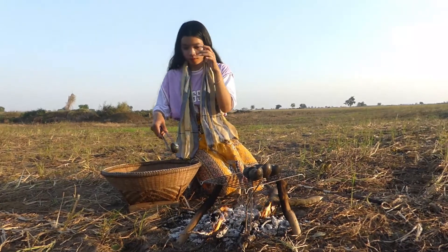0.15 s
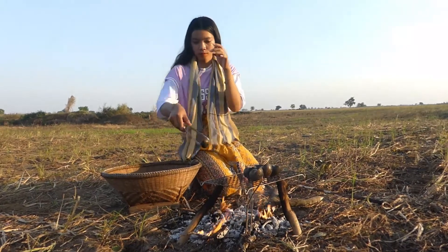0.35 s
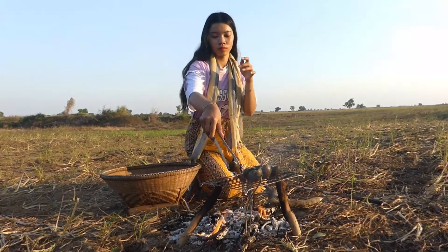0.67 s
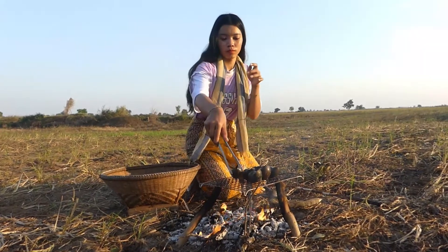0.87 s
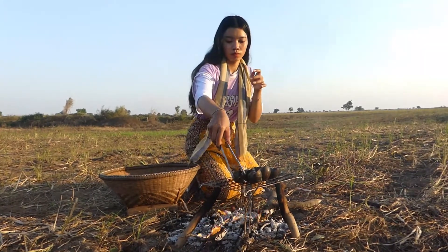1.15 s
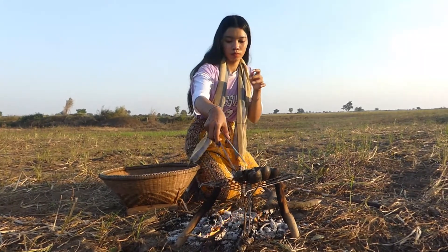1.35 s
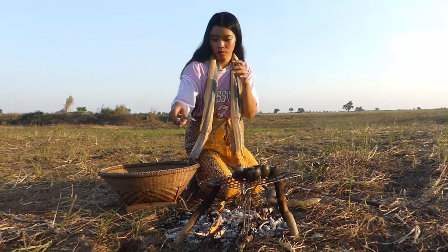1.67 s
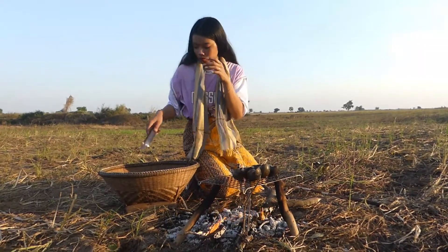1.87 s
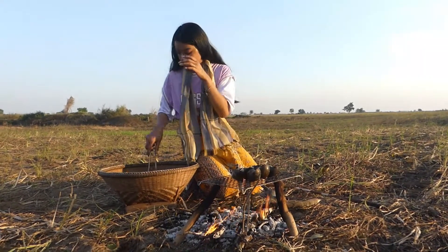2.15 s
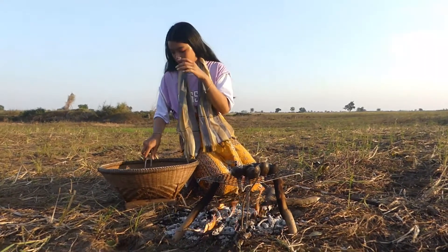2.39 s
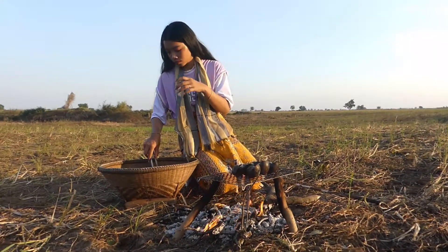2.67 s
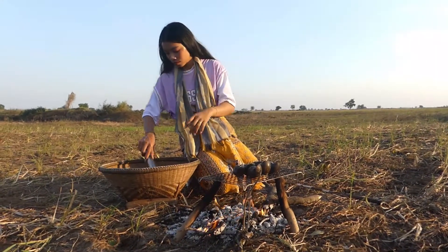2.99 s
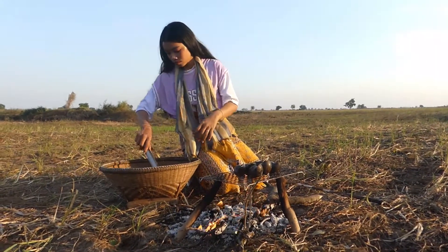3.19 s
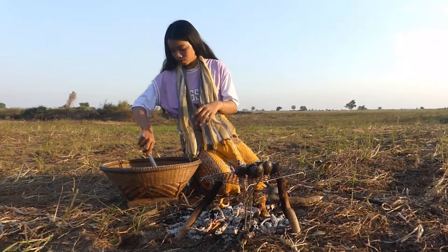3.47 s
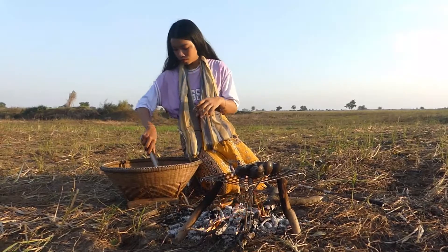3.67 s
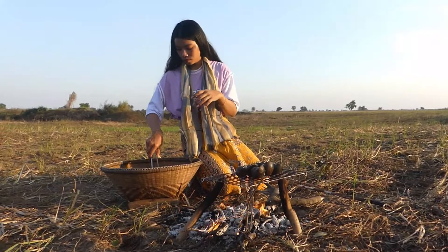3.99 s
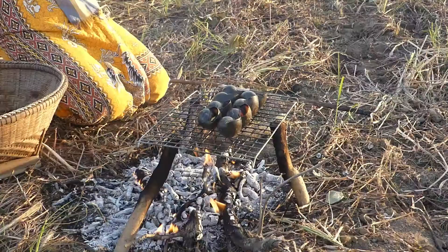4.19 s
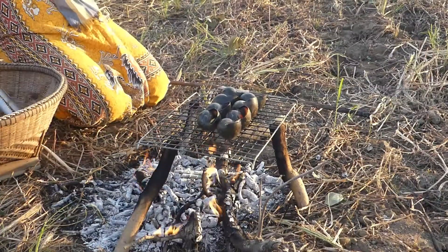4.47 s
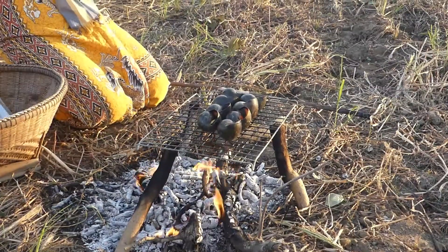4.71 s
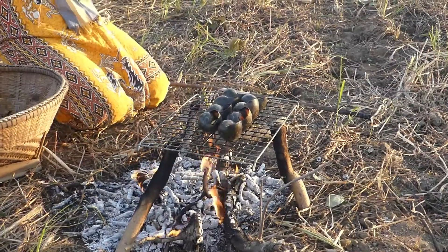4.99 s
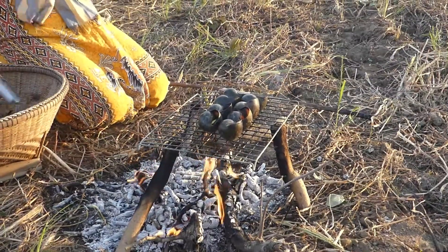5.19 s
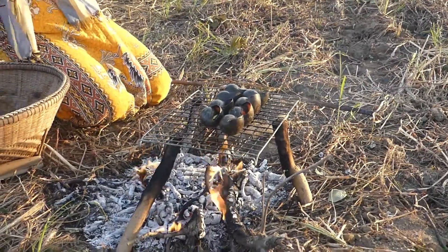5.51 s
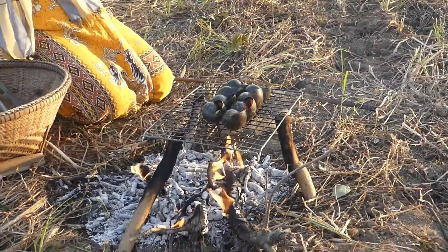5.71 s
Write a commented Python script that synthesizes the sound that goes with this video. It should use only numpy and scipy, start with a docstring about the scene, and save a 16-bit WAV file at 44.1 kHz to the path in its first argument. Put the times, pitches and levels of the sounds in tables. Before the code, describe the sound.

A soft, wide, open-field hush with low uneven wind and a faint steady insect-like band. From 0 to 2 s it is sparse: delicate metal tong ticks, a few dry ember clicks, faint gliding chick peeps, and light shell taps near 0.3, 1.0 and 1.35 s. From about 2.3 s tongs rummage among snail shells in a woven basket: hard, dry clacks with quick chattering rebounds, short gritty scrapes and small bright chinks, strong around 2.6, 2.9 and 3.55 s. Chick peeps grow clearer and quicker between 2.4 and 4.1 s, while knocks thin out after 3.65 s. At 4.2 s everything cuts to complete silence until about 4.46 s. The hush fades back and the shells sound closer, with fuller thuds under the knocks. Dense rattling and scraping peaks around 4.9, 5.15 and 5.5 s, with a low wind swell near 5.35 s, a few faint peeps, and busy scraping at the end, 5.85 s.

```python
"""Snail shells knock, chatter and scrape in a woven basket as metal tongs rummage among them.
Each shell is a set of dying rings, struck by bursts of contacts or rubbed by dense tiny clicks.
The tongs tick with two short rings, embers of a small fire snap as clicks, chicks peep as gliding sines.
Shaped noise makes the wide hush and wind of the open field. All falls silent for a quarter second;
then the hush fades back in, and the thuds under the knocks are fuller, as if nearer to the basket."""
import sys
import numpy as np
from scipy import signal
from scipy.fft import rfft, irfft
from scipy.io import wavfile
from scipy.ndimage import uniform_filter1d

SR = 44100
rng = np.random.default_rng(int(sys.argv[2]) if len(sys.argv) > 2 else 0)


def int16_out(signal):
    """Quantize to a 16-bit WAV file."""
    q = np.round(np.clip(np.atleast_2d(signal).T, -1, 1) * 32767)
    wavfile.write(sys.argv[1], SR, q.astype(np.int16))


def voltage_ratio(decibels):
    """Convert decibels (scalar or array-like) to amplitude ratios, 20 dB per decade."""
    exponent = np.asarray(decibels, float) / 20
    return 10 ** exponent


N = 257984
TIME = np.arange(N) / SR

# Hush of the field, summed over left and right: [f/Hz, relative level per Hz/dB]
HUSH_SPECTRUM = [(20, -35.5), (60, -3.5), (110, 4), (280, -4.5), (400, -8), (620, -12), (1100, -13),
                 (1450, -13), (2900, -18.5), (4700, -18), (7600, -19), (10000, -17.5), (13000, -22),
                 (15300, -24.5), (16500, -51.5)]
# How alike left and right are, 1 same and -1 opposed: [f/Hz, likeness]
HUSH_LIKENESS = [(60, -0.62), (130, -0.49), (290, -0.65), (640, -0.52), (1410, -0.48), (3100, 0.16),
                 (6820, 0.42), (15000, 0.48)]
# Stereo balance of the field: [f/Hz, left over right/dB]
HUSH_BALANCE = [(60, 1.5), (240, 2), (950, 1), (3770, 0.5), (15000, -1)]
# Far steady bands, the top one of insects: [f/Hz, width/Hz, level on the hush spectrum's scale/dB]
DRONE_BANDS = [(478, 26.8, 5.5), (829, 15, -4), (5300, 350, -18.5)]
# Slow course of the wind, before its lumps and its low-pass: [t/s, level/dB]
WIND_COURSE = [(0, -63.5), (4.2, -65), (4.46, -73), (4.9, -60), (5.15, -60), (5.35, -51), (5.55, -58),
               (5.85, -58.5)]
# Return of the hush after the silence: [t/s, change of level/dB]
HUSH_RETURN = [(4.456, -13), (4.6, -4.5), (5.0, -1.5), (5.85, 2.5)]
# Small ticks of the tongs: [t/s, peak level/dB, upper ring over lower ring/dB]
TONG_TICKS = [(0.194, -42.5, 0), (0.2217, -50, -17), (0.392, -39, 2), (0.4125, -51, -17),
              (1.1724, -33.5, 4.5), (1.205, -40, 3), (1.2788, -43.5, 1), (1.385, -37.5, 2), (1.42, -46, 2),
              (1.589, -50, -4), (1.7, -45, 0), (1.7734, -38.5, 3), (1.956, -54, -14), (2.144, -51, -15),
              (3.948, -49, -17)]
# The two rings of the tongs: [f/Hz, time to fall by 60 dB/s]
TONG_RINGS = [(3900, 0.0087), (8800, 0.0049)]
# Chick calls: [start t/s, length/s, middle f/Hz, glide from start to end/Hz, level/dB]
CHICK_PEEPS = [(.205, .028, 3250, 530, -66), (0.223, 0.048, 3650, -390, -59.5),
               (0.667, 0.066, 3520, 8, -62), (0.823, 0.029, 3350, 230, -70),
               (1.003, 0.063, 3600, -160, -58), (1.21, 0.031, 3880, 60, -63),
               (1.263, 0.092, 3460, 250, -67), (1.356, 0.074, 3600, 32, -63), (1.507, .2, 3680, 600, -69.5),
               (1.586, .05, 3545, -170, -60), (1.761, 0.064, 3660, -40, -62),
               (1.862, .128, 3550, -260, -72.5), (1.984, 0.047, 3750, 30, -63),
               (2.18, 0.05, 3720, -160, -60.5), (2.379, .04, 3870, -280, -52),
               (2.544, 0.03, 3140, 349.5, -64.5), (2.565, 0.056, 3920, -10, -54),
               (2.776, 0.029, 4220, -750, -52.5), (2.933, 0.048, 3880, -50, -55),
               (3.101, 0.045, 3960, 28, -51), (3.276, 0.053, 3820, 398, -52.5),
               (3.42, .05, 4200, -220, -50), (3.581, 0.036, 4770, -140, -49),
               (3.644, 0.026, 4130, 630, -63), (3.695, 0.029, 4270, -1450, -64),
               (3.731, .018, 3700, 900, -59), (3.74, .036, 4660, -20, -49.5), (3.795, .02, 3500, 480, -62),
               (3.817, 0.018, 4650, 270, -61), (3.849, 0.022, 4520, -470, -60),
               (3.885, 0.027, 3900, 250, -52), (3.9, 0.031, 4680, -350, -50.5),
               (3.958, 0.029, 3850, 390, -58), (4.073, 0.029, 4350, -10, -48),
               (5.235, .031, 3900, -320, -64), (5.255, 0.012, 5300, -400, -63),
               (5.29, 0.014, 5330, -300, -70), (5.632, .04, 3820, -20, -60)]
# Rings of a shell in the heap: [f/Hz, relative level/dB, time to fall by 60 dB/s]
SHELL_RINGS = [(322, -7.5, 0.022), (540, 5, 0.01), (690, -11.5, 0.017), (980, -6.5, 0.042),
               (1250, -3.5, 0.012), (1650, -0.5, 0.014), (1790, -4.5, 0.0062), (2360, -2.5, 0.012),
               (2600, -23, 0.0054), (2900, -3, 0.0079), (3135, -6, 0.014), (3750, -8, 0.024),
               (4200, 4, 0.0018), (4650, -2.5, 0.0068), (5260, -2.5, 0.0052), (6144, 0, 0.018),
               (7005, 2, 0.012), (7800, -1, 0.008), (8940, -2.5, 0.025), (9990, -0.5, 0.017),
               (11200, -16, 0.0063), (11900, 5, 0.0056), (13570, -3.5, 0.015), (14200, -11, .006)]
# Shell knocks: [t/s, nominal peak level/dB, low ring f/Hz, upper rings/dB, top rings/dB];
# the last two are relative, before a fixed lift
SHELL_KNOCKS = [(0.271, -42.5, 475, -20, -17), (0.337, -45, 1280, -27, -20), (1.01, -31, 1520, -10.5, -12),
                (1.016, -34.5, 1510, -3, -8), (1.022, -48.5, 1500, -14, -10), (1.029, -38, 1380, -20, -14),
                (1.347, -24, 1430, -19, -54), (2.03, -29, 1980, 1, -25.5), (2.273, -20.5, 1900, -13, -15),
                (2.287, -27, 890, -17, -16), (2.333, -15.5, 1970, -3.5, -7), (2.338, -19.5, 1900, 0.5, -8),
                (2.359, -34.5, 523, -6, 0.5), (2.399, -32, 1950, -2, -9.5), (2.417, -39.5, 980, -10, -14),
                (2.477, -27.5, 1400, -17, -7.5), (2.54, -27, 1760, -23.5, -22),
                (2.637, -10.5, 1420, -12, -10), (2.644, -20.5, 1250, -15, -10),
                (2.677, -29, 1190, -20, -12), (2.683, -25, 1220, -4, -18), (2.697, -43, 1400, -14, -20.5),
                (2.721, -32.5, 1220, -12.5, -21), (2.762, -32.5, 2400, -6, -26),
                (2.789, -12.5, 1650, -27, -56), (2.809, -33, 1080, -21, -44), (2.912, -17, 990, 7.5, 6),
                (2.92, -13.5, 1417, 5, -49), (2.968, -24.5, 1220, -9.5, -14.5),
                (3.038, -20, 1260, -36, -52), (3.061, -22.5, 2520, -12, -14.5),
                (3.098, -26.5, 2020, -5.5, -9), (3.129, -26, 1070, -2, -29.5),
                (3.153, -36, 1060, -6.5, -18), (3.225, -39.5, 510, -5, -7), (3.316, -30, 1410, -8, -5),
                (3.345, -27.5, 524, -4, 1), (3.365, -20, 1360, -5, -15), (3.378, -22.5, 1360, -22, -15),
                (3.391, -19.5, 1250, -14, -19), (3.397, -22, 1250, -11.5, -16),
                (3.424, -20, 980, -11, -7.5), (3.439, -29, 1020, -15, -1), (3.452, -28.5, 1220, -15, -5),
                (3.499, -32, 1390, -1, -12), (3.547, -9.5, 1590, -10, -22), (3.558, -20, 544, -27, -35),
                (3.61, -30, 1510, -8.5, -21), (3.63, -30.5, 985, -38, -34), (3.879, -36.5, 1930, -28, -35),
                (3.988, -28, 2090, -15, -14), (4.024, -31.5, 1470, -8, 1), (4.049, -34.5, 1890, -11, -9),
                (4.104, -25.5, 1070, 0.5, 3), (4.48, -31, 1880, 1.5, 2.5), (4.613, -29.5, 2330, -12, -15.5),
                (4.629, -42, 514, 11, -24), (4.651, -17.5, 1646, 0.5, -20.5), (4.679, -26, 1500, -17, -19),
                (4.708, -29, 1220, 0, -7), (4.727, -26.5, 2500, -14, -37), (4.76, -34.5, 1090, -9.5, -35),
                (4.785, -25, 1350, -1.5, -0.5), (4.816, -20.5, 1050, 1, -12), (4.841, -15, 2180, -8.5, -22),
                (4.857, -23, 2300, 3, -17.5), (4.885, -27.5, 724, -22, -30), (4.906, -11, 2400, -8, -24),
                (4.911, -6, 2360, -11.5, -18.5), (4.932, -5.5, 2410, -12, -31), (4.966, -28, 1010, 9, 0),
                (4.98, -23.5, 2360, -7, 2), (4.986, -11, 1470, -0.5, -27), (4.996, -19, 1660, -16, -24),
                (5.051, -15.5, 1920, -6.5, -7), (5.056, -19, 1894, -9.5, -15), (5.062, -26, 2520, 1, -11),
                (5.085, -16, 2280, -12, -18), (5.148, -6.5, 2015, -5.5, -15),
                (5.154, -10.5, 1710, -3, -21.5), (5.192, -24, 1370, -3, -13.5),
                (5.314, -21, 1030, -18, -13), (5.346, -25.5, 2360, -10, -15), (5.382, -29, 1780, -26, -26),
                (5.412, -21.5, 980, 7.5, 9), (5.428, -10.5, 1070, 2, 4.5), (5.449, -31, 1534, 2, -18),
                (5.457, -18, 1640, -22, -13.5), (5.498, -9.5, 1600, -8.5, -44),
                (5.515, -5.5, 1760, -8.5, -20), (5.529, -22.5, 624, -11, -15.5),
                (5.557, -11, 716, -12, -15), (5.561, -17, 455, -15, -29), (5.6, -27.5, 1740, -15.5, -43),
                (5.703, -24, 860, -15, -28), (5.718, -34, 604, -12, -24), (5.742, -15.5, 1120, -2, -4),
                (5.748, -27, 1174, 1, -18.5), (5.777, -17, 980, 2, -1), (5.795, -19, 595, -5, -3),
                (5.82, -15, 640, 2, -3), (5.837, -16.5, 1880, -7, -12)]
# Snapping embers: [t/s, peak level/dB]
EMBER_SNAPS = [(0.7344, -39.5), (1.075, -38.5), (1.3016, -37), (1.371, -41), (1.5127, -34.5), (5.2854, -39)]
# Shells sliding over each other and the weave, one row a stroke:
# [hardest at t/s, level/dB, brightness over level/dB, weight on the weave over level/dB]
SLIDE_STROKES = [(1.019, -55.5, -3.5, -18), (2.3, -60, 4, 0.3), (2.38, -50.5, -7, -3.5),
                 (2.5, -53, -14, -1.5), (2.66, -55, -1, -12), (2.7, -47.5, -7, -11), (2.76, -52, -8, -15),
                 (2.81, -53.5, -12, -3.5), (2.942, -43, -10, -11), (3.07, -48.5, -3.8, -15),
                 (3.131, -49.5, -9, -11), (3.27, -63, -1, 6), (3.361, -48, 3, -10), (3.41, -41.5, -8.5, -5),
                 (3.46, -46.5, 4, -7), (3.568, -44, -9, -6), (3.741, -55, -0.5, -11), (3.84, -55, -13, -31),
                 (3.89, -56, -7, -26), (3.94, -53.5, -13, -26), (4.03, -52.5, 3.5, 0),
                 (4.071, -48.5, 7, -6), (4.108, -42.5, -5, -4.5), (4.17, -55.5, -2.5, -3),
                 (4.662, -39, -3, -12), (4.721, -43.5, -5, -7), (4.791, -51.5, 5, 1.5),
                 (4.86, -38.5, -8.5, -1), (4.929, -45, -16, 6), (4.981, -41, 2, -0.5), (5.06, -59, 10, -5),
                 (5.17, -48.5, -29, -1), (5.21, -53, -5, -13), (5.322, -48, -4, 2),
                 (5.379, -45.5, -5, -2.5), (5.452, -46.5, 5.5, -1), (5.528, -51, -15, 4),
                 (5.6, -50.5, -12, 3.2), (5.71, -56, -6, 7.5), (5.792, -38.5, 1.5, 0),
                 (5.84, -37.5, 0, 1.5)]
# Clear chinks that ring on after a knock: [t/s, f/Hz, peak level/dB]
RINGING_CHINKS = [(1.016, 3920, -37), (2.333, 4047, -38), (2.417, 6150, -44.5), (2.637, 5320, -25),
                  (2.678, 3750, -26), (2.92, 3636, -17.5), (3.548, 4820, -15), (3.988, 4940, -38),
                  (4.104, 3135, -32), (4.841, 4530, -29.5), (4.857, 3605, -32), (4.932, 2900, -23),
                  (4.986, 3750, -20), (5.051, 4400, -25.5), (5.148, 3820, -19.5), (5.449, 3740, -31.5),
                  (5.457, 3810, -25), (5.498, 3250, -18.5), (5.515, 3750, -21.5), (5.529, 3690, -24),
                  (5.742, 3840, -16), (5.777, 4030, -21.5), (5.837, 4680, -13.5)]
# Stereo balance of everything sent through the basket: [f/Hz, left over right/dB]
BASKET_BALANCE = [(60, -6.5), (180, 2.5), (550, 3), (1650, 2), (4970, 3), (15000, -4)]

SILENCE_START_S, SILENCE_END_S = 4.2, 4.456
HUSH_DB = -57.5  # before the deep bass is taken out
ARCH_HZ_PER_S = 7500  # longer peeps arch higher
DRAWN_S = 0.085  # peeps this long or longer only glide
CHATTER_MS, CHATTER_MS_PER_DB = 5.75, 0.23  # bright knocks chatter longer than dull ones
CREST_DB = 8  # nominal peak of a knock over its loudest 3 ms
# The gripped tongs ring in each knock; the level is over that of the upper rings
HELD_HZ, HELD_SPREAD, HELD_DB, HELD_T60_S = 3797, 0.04, 5, 0.016
# Dull knocks are soft contacts that lose the treble
SOFT_HZ, SOFT_OCTAVES_PER_DB = 20000, 0.0564
# The basket floor under each knock, relative to its peak; fuller after the silence
THUD_HZ, THUD_SPREAD, THUD_DB, THUD_T60_S, THUD_NEAR_DB = 307, 0.19, -30, 0.03, 9
RISE_DB_PER_S, FALL_DB_PER_S = 548, 291.5  # each sliding stroke
CHINK_T60_S = 0.03


def evened(x):
    """Scales to an rms of 1."""
    return x / np.sqrt(np.mean(x ** 2) + 1e-20)


def read(points, hz):
    """Reads a curve between its points, along a logarithmic pitch axis."""
    f, value = np.transpose(points)
    return np.interp(np.log(hz + 1), np.log(f + 1), value)


def add(mix, s, sound):
    """Mixes a sound in at s seconds."""
    part = mix[round(s * SR):][:len(sound)]
    part += sound[:len(part)]


def peaked(x, db):
    """Scales the highest swing to db."""
    return voltage_ratio(db) * x / abs(x).max()


def filtered(x, hz, kind, order=2):
    """Passes only the sound above (high) or below (low) a pitch."""
    return signal.sosfilt(signal.butter(N=order, Wn=hz, btype=kind, fs=SR, output="sos"), x)


def below(x, hz):
    """Keeps the sound below a pitch without delaying it, so that it can be subtracted."""
    return signal.sosfiltfilt(signal.butter(N=2, Wn=hz, fs=SR, output="sos"), x)


def rings(hz, db, t60, sign=1, size=2000):
    """Sum of dying sines, each starting inward or outward."""
    t = np.arange(size)[:, None] / SR
    swing = np.sin(2 * np.pi * np.minimum(hz, SR / 2.2) * t)
    return (sign * voltage_ratio(db - 60 * t / t60) * swing).sum(axis=1)


def field():
    """Wide noise hush with far drone bands, and low lumpy wind, both partly opposed between left and right."""
    frames, hz = N // 512 + 5, np.fft.rfftfreq(2048, 1 / SR)[:, None]
    a, b, c, d, patches, lumps = rng.standard_normal((frames, 1025, 6)).T
    # The hush varies in patches of pitch and time, the wind in lumps of time
    patches = evened(uniform_filter1d(uniform_filter1d(patches, 20, 0), 6, 1))
    lumps = evened(uniform_filter1d(lumps[0], 4))

    same = np.clip(read(HUSH_LIKENESS, hz), -0.95, 0.95)
    lean = voltage_ratio(read(HUSH_BALANCE, hz) / 2)
    left, other = a + 1j * b, c + 1j * d
    right = same * left + np.sqrt(1 - same ** 2) * other
    stereo = np.array([lean * left, right / lean])
    stereo /= np.sqrt(lean ** 2 + lean ** -2. + 2 * same)  # the spectrum is that of left plus right

    hush_db = read(HUSH_SPECTRUM, hz)
    drones = sum(voltage_ratio(2 * db) * np.exp(-((hz - f) / width) ** 2) for f, width, db in DRONE_BANDS)
    colour = np.sqrt(voltage_ratio(2 * hush_db) + drones)
    wind_db = np.interp(np.arange(frames) * 512 / SR, *np.transpose(WIND_COURSE)) + 4.0 * lumps
    low = 1 / (1 + (hz / 200) ** 4)
    hush_frames = stereo * colour * voltage_ratio(1.46 * patches)
    wind_frames = stereo * voltage_ratio(hush_db + wind_db) * low
    hush = signal.istft(hush_frames, nperseg=2048, noverlap=1536)[1][:, :N]
    wind = signal.istft(wind_frames, nperseg=2048, noverlap=1536)[1][:, :N]

    scale = np.std(hush.mean(axis=0))
    return_db = np.interp(TIME, *np.transpose(HUSH_RETURN), left=0)
    return (voltage_ratio(HUSH_DB + return_db) * filtered(hush, 200, "high") + wind) / scale


def ticks():
    """The small metal tongs tick with two very short rings and a softened start."""
    out, (hz, t60) = np.zeros(N), np.transpose(TONG_RINGS)
    onset = np.minimum(TIME[:800] / 0.00047, 1)
    for s, db, upper_db in TONG_TICKS:
        tick = rings(hz, np.array([0, upper_db]), t60, size=800) * onset
        add(out, s, peaked(tick, db))
    return out


def peeps():
    """Chicks give near sines; pitch glides, and in short peeps also arches up to a flat top and down."""
    out = np.zeros(N)
    for s, length, middle_hz, glide_hz, db in CHICK_PEEPS:
        u = np.linspace(-1, 1, round(length * SR))  # -1 at the start, 1 at the end
        arch_hz = ARCH_HZ_PER_S * length * (length < DRAWN_S) * abs(u) ** 2.4
        hz = middle_hz + glide_hz * u / 2 - arch_hz
        flutter = voltage_ratio(1.8 * evened(uniform_filter1d(rng.standard_normal(len(u)), 150)))
        swell = (1 - u ** 2) ** 0.76
        tone = np.sin(2 * np.pi * np.cumsum(hz) / SR)
        add(out, s, voltage_ratio(db) * np.sqrt(2) * flutter * swell * tone)
    return out


def shell(luck, lowest_hz, upper_db, top_db):
    """One shell: common rings, varied by where it is struck; little sounds under its lowest loud ring."""
    hz, db, t60 = np.transpose(SHELL_RINGS)
    tilt_db = read([(2100, 0.0013), (2800, upper_db), (5600, upper_db), (6500, top_db)], hz)
    tilt_db += 7.1 * np.minimum(np.log2(hz / lowest_hz), 0)
    return rings(hz * (1 + 0.03 * luck[0]), db + tilt_db + 2.5 * luck[1], t60, np.sign(luck[2]))


def knocks():
    """Each knock is a chatter of quick rebounds that swells in about a millisecond, shared by two shells."""
    out, ms = np.zeros(N), np.arange(2000) / SR * 1000
    shell_luck = rng.standard_normal((len(SHELL_KNOCKS), 2, 3, len(SHELL_RINGS)))
    pitch_luck = rng.standard_normal((len(SHELL_KNOCKS), 2))
    for k, (s, db, low_hz, upper_db, top_db) in enumerate(SHELL_KNOCKS):
        chatter_ms = max(CHATTER_MS + CHATTER_MS_PER_DB * top_db, 1)
        pressure = np.minimum(0.25 + ms / 1.3, 1) * np.exp(-(ms / chatter_ms) ** 1.9)
        hits = rng.random((2, len(ms))) < 3000 / SR  # about 3000 chances of contact per second
        contacts = pressure * rng.standard_normal((2, len(ms))) * hits
        contacts[:, 0] = 0.57  # the first contact is sure

        held_hz = HELD_HZ * (1 + HELD_SPREAD * pitch_luck[k, 0])
        tongs = rings(held_hz, upper_db + HELD_DB, HELD_T60_S)
        loudest = rings(low_hz, 4, 0.004 + 11 / low_hz) + tongs
        bodies = [shell(one, low_hz, upper_db + 8.5, top_db + 3) + loudest for one in shell_luck[k]]
        knock = signal.fftconvolve(contacts, bodies, axes=1).sum(axis=0)
        knock = filtered(knock, 0.41 * low_hz, "high")  # small shells carry no bass
        soft_hz = np.clip(SOFT_HZ * 2 ** (SOFT_OCTAVES_PER_DB * top_db), 2000, 0.45 * SR)
        knock = filtered(knock, soft_hz, "low")
        loudest_3ms = np.sqrt(uniform_filter1d(knock ** 2, 130).max())
        add(out, s, voltage_ratio(db - CREST_DB) * knock / loudest_3ms)

        thud_hz = THUD_HZ * (1 + THUD_SPREAD * pitch_luck[k, 1])
        thud_db = db + THUD_DB + THUD_NEAR_DB * (s > SILENCE_START_S)
        add(out, s, rings(thud_hz, thud_db, THUD_T60_S) * np.minimum(ms / 3, 1))
    return out


def embers():
    """Each ember snap is one bare, bright click: a very short burst of treble-rich noise."""
    out = np.zeros(N)
    for s, db in EMBER_SNAPS:
        spit = rng.standard_normal(200)
        bright = spit[1:] - 0.5 * spit[:-1]
        add(out, s, peaked(bright * voltage_ratio(-60 * TIME[:199] / 0.0037), db))
    return out


def slide():
    """Dense stick-slip clicks of uneven size, spread over a dozen shells; each stroke swells and dies away."""
    clumps = evened(uniform_filter1d(rng.standard_normal(N), 250))
    slips_per_s = 1500 * voltage_ratio(6.0 * clumps)
    size = voltage_ratio(2.8 * np.minimum(rng.exponential(1, N), 5))
    clicks = size * (rng.random(N) < slips_per_s / SR) * rng.choice([-1, 1], N)
    which, luck = rng.integers(0, 12, N), rng.standard_normal((12, 3, len(SHELL_RINGS)))
    grit = sum(signal.oaconvolve(clicks * (which == k), shell(luck[k], 660, 0.83, -10.5))[:N]
               for k in range(12))
    dull, deep = below(grit, 3500), below(grit, 1000)

    low, mid, high = np.zeros((3, N))  # power of three bands over time
    for s, db, bright_db, weight_db in SLIDE_STROKES:
        # the lower of a rising and a falling line peaks at s
        swell_db = np.minimum(RISE_DB_PER_S * (TIME - s), FALL_DB_PER_S * (s - TIME))
        power = voltage_ratio(2 * (db + swell_db))
        low += power * voltage_ratio(2 * weight_db)
        mid += power
        high += power * voltage_ratio(2 * bright_db)
    return np.sqrt(low) * evened(deep) + np.sqrt(mid) * evened(dull - deep) + np.sqrt(high) * evened(grit - dull)


def chinks():
    """One shell ring kept sounding by a few milliseconds of quick, soft rebounds."""
    out = np.zeros(N)
    for s, hz, db in RINGING_CHINKS:
        rebounds = rng.standard_normal(300) * np.exp(-TIME[:300] / 0.0035)
        add(out, s, peaked(np.convolve(rebounds, rings(hz, 0, CHINK_T60_S)), db))
    return out


def basket(x):
    """The bowl and the ground throw back a short scatter of echoes; low and middle sound leans left."""
    x = filtered(x, 240, "high", order=3)  # small things radiate no bass
    t = np.arange(4000) / SR
    hits = rng.random((2, len(t))) < 3000 / SR
    echoes = rng.standard_normal((2, len(t))) * hits * voltage_ratio(-60 * t / 0.059) * (t > 0.002)
    echoes /= np.linalg.norm(echoes[0])
    wet = x + voltage_ratio(-10.5) * signal.fftconvolve(x[None], echoes, axes=1)[:, :N]
    lean = voltage_ratio(read(BASKET_BALANCE, np.fft.rfftfreq(N, 1 / SR)) / 2)
    return irfft(rfft(wet) * [lean, 1 / lean], N)


def scene():
    """Small sounds through the basket plus the open field, all silenced for a quarter second."""
    small = ticks() + peeps() + knocks() + embers() + slide() + chinks()
    outside = np.maximum(SILENCE_START_S - TIME, TIME - SILENCE_END_S)  # seconds from the silence
    gate = np.clip(outside / 0.002, 0, 1)
    return (field() + basket(small)) * gate


def low_pass(x):
    """Removes everything above the highest recorded frequency."""
    return signal.sosfilt(signal.butter(12, 16800, fs=SR, output="sos"), x)


def record(dry):
    """Turns the finished mix into the sound that is written out."""
    return low_pass(dry)


dry = scene()
out = record(dry)
int16_out(out)
```